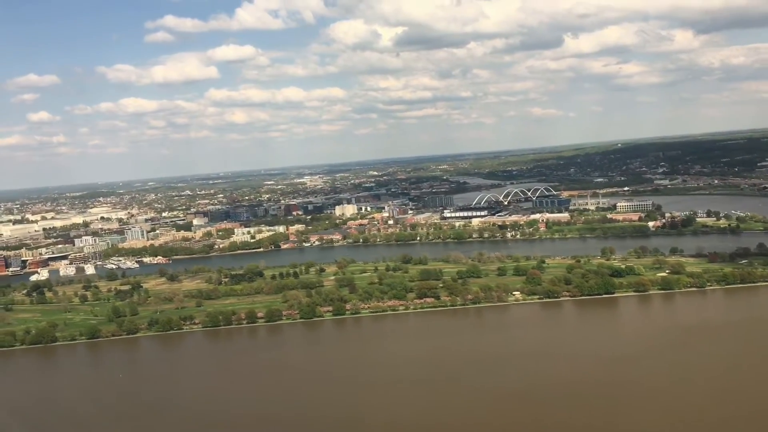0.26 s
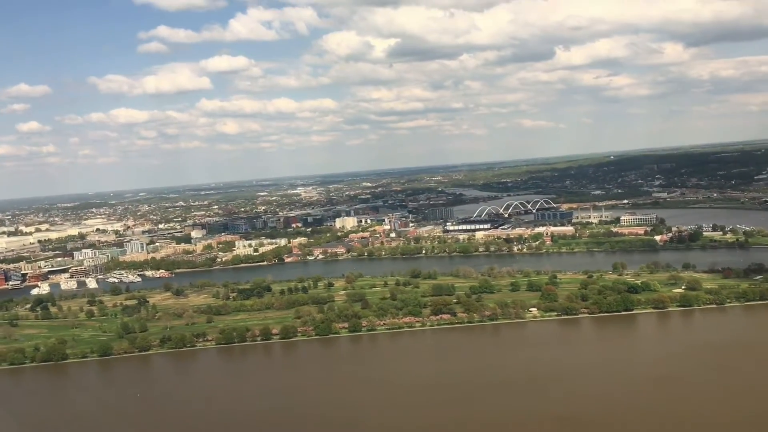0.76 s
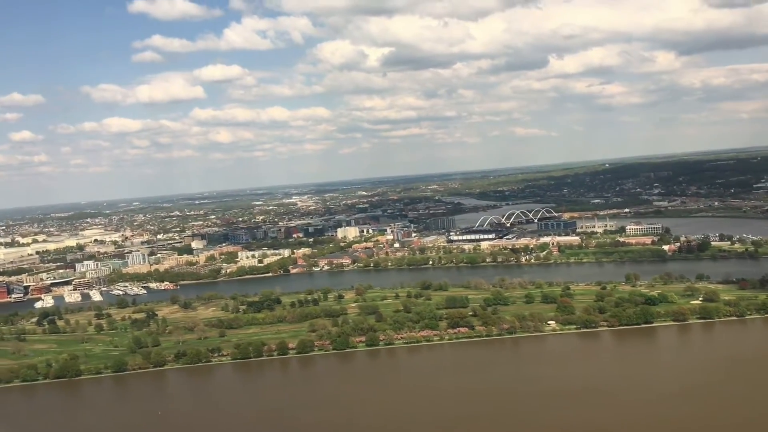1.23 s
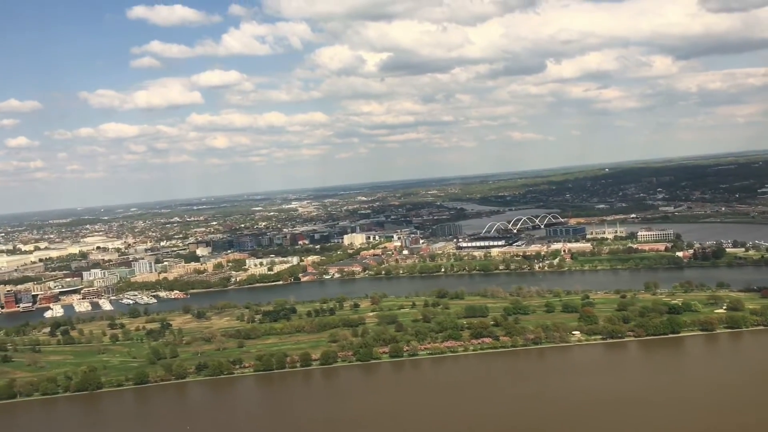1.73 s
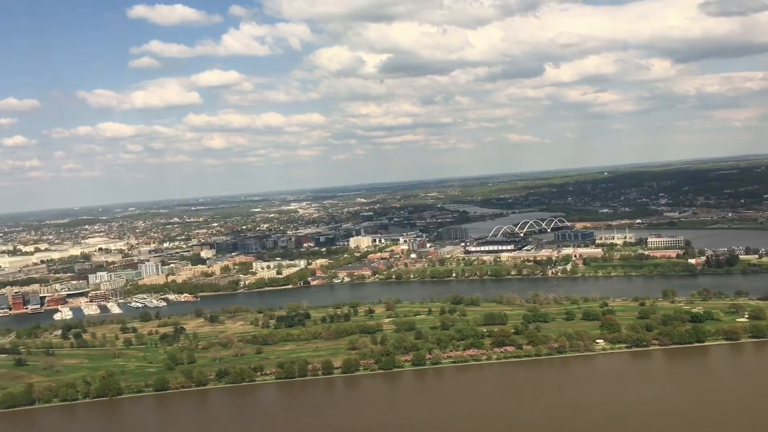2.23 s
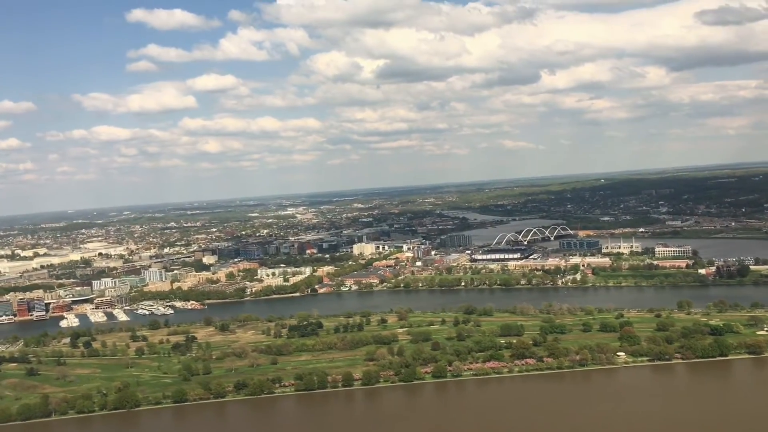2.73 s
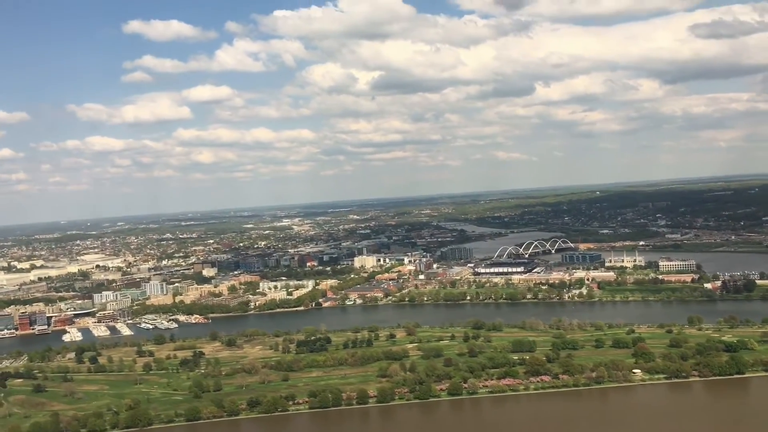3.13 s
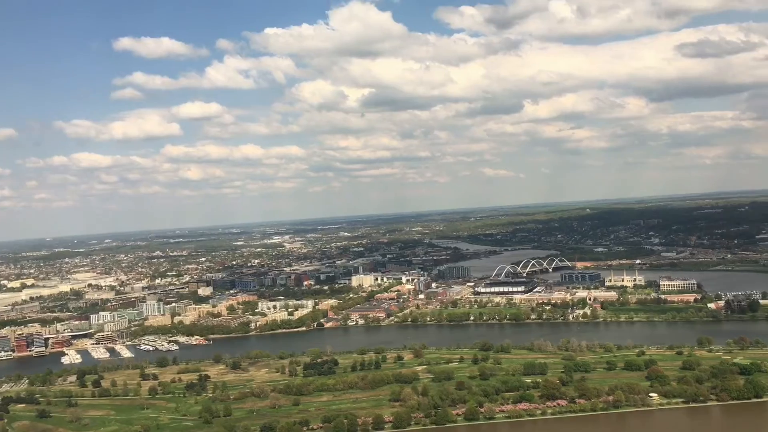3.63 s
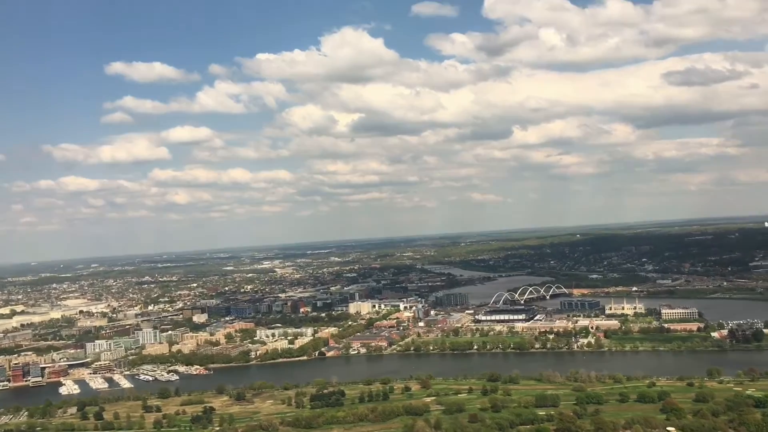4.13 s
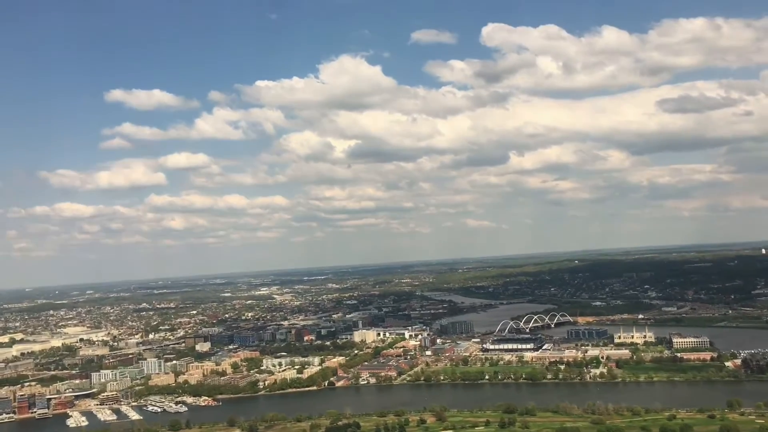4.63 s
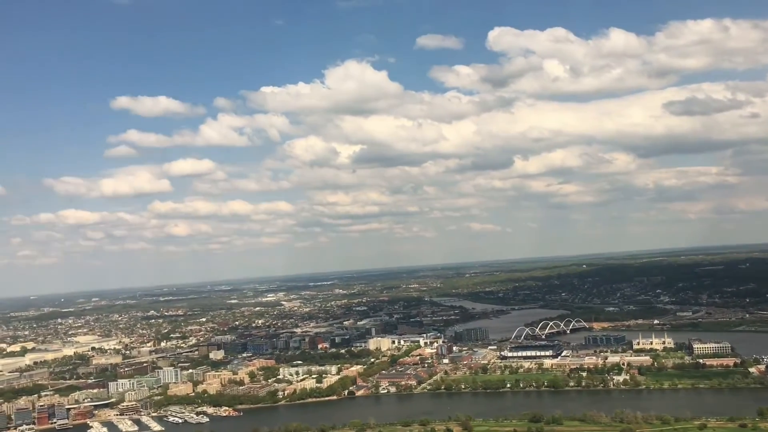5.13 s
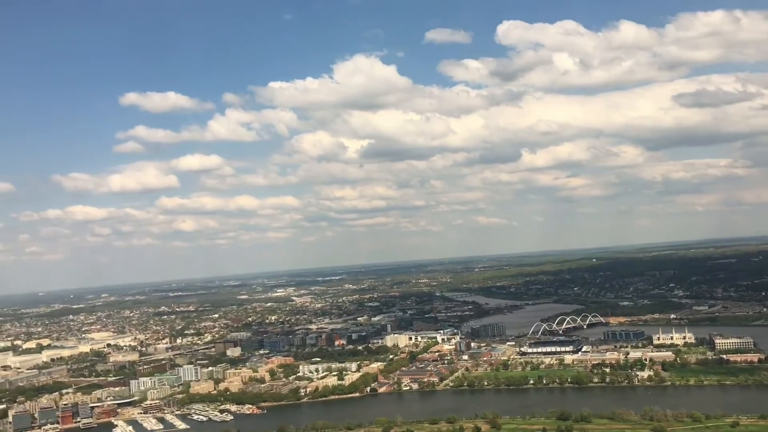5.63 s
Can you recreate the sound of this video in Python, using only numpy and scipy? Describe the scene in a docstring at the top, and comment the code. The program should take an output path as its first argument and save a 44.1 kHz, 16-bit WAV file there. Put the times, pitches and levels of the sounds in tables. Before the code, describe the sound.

Deep, steady jet roar inside an airliner cabin, with low booming rumble, soft air hiss, faint wavering whine and occasional thumping buffets.

```python
"""A window seat inside a regional airliner climbing after takeoff, the microphone at the seat.
Jet exhaust and airflow shake the fuselage: shaped noise makes a deep roar, with thumping buffets, under a
hiss of air. Supersonic fan tips add a faint buzz-saw whine, a wavering tone on each multiple of the shaft
speed. Steady machine tones lie behind it, and grainy puffs of noise rustle nearby."""
import sys
import numpy as np
from scipy import signal
from scipy.fft import irfft, next_fast_len
from scipy.io import wavfile
from scipy.ndimage import uniform_filter1d, minimum_filter1d

SR = 44100
rng = np.random.default_rng(int(sys.argv[2]) if len(sys.argv) > 2 else 0)


def store_pcm(level_fs):
    """Save levels as 16-bit WAV."""
    pcm = np.round(np.clip(level_fs, -1, 1) * 32767).astype(np.int16)
    wavfile.write(sys.argv[1], SR, np.atleast_2d(pcm).T)


N = 258426
TIME = np.arange(N) / SR  # s
FREQ = np.fft.rfftfreq(2 * next_fast_len(N // 2 + 1), 1 / SR)  # Hz
PATH_STEPS = 2048  # points in one slow path across the whole scene


def gain_of(db):
    """Decibels to amplitude."""
    return np.exp(np.asarray(db) * np.log(10) / 20)


def evened(x):
    """Scales to rms 1."""
    return x / np.sqrt(np.mean(abs(x) ** 2) + 1e-30)


def read(points, hz):
    """A spectrum's dB at hz, on a log-frequency axis; silent beyond its ends."""
    f, db = np.transpose(points)
    return np.interp(np.log(hz + 1), np.log(f + 1), db, left=-200, right=-200)


def bumps(peaks):
    """Resonances, or dips where dB is negative, as dB over FREQ."""
    return sum(db / (1 + (2 * (FREQ - hz) / width) ** 4) for hz, width, db in peaks)


def curve(rows):
    """The second column of a timed table, at every sample."""
    s, values = np.transpose(rows)
    return np.interp(TIME, s, values)


def swell(s, length, order=2):
    """A smooth rise to 1 at time s, and its fall; a higher order holds the top."""
    return np.exp(-np.minimum(2 * abs(TIME - s) / length, 3) ** order)


def noise(db):
    """Noise of rms 1 with the spectrum db over FREQ."""
    real, imaginary = rng.standard_normal((2, len(FREQ)))
    spectrum = (real + 1j * imaginary) * gain_of(db)
    return evened(irfft(spectrum)[:N])


def flutter(width_hz):
    """A slow complex wander of rms 1 and the given bandwidth, in PATH_STEPS steps."""
    hz = np.fft.fftfreq(PATH_STEPS, N / SR / PATH_STEPS)
    z = rng.standard_normal((PATH_STEPS, 2)) @ [1, 1j]
    return evened(np.fft.ifft(z / (1 + (2 * hz / width_hz) ** 2)))


def stretched(path):
    """A slow path joined by straight lines, at every sample."""
    path = path.astype(np.float32)
    ramp = np.linspace(0, 1, N // (len(path) - 1) + 1, False, dtype=np.float32)
    return (path[:-1, None] + np.diff(path)[:, None] * ramp).ravel()[:N]


def tone(turns, path):
    """A line of rms 1 whose strength and phase follow the complex path."""
    angle = (2 * np.pi * (turns - np.floor(turns))).astype(np.float32)
    path = np.sqrt(2) * evened(path) * np.exp(2j * np.pi * rng.random())  # random starting phase
    return stretched(path.real) * np.cos(angle) - stretched(path.imag) * np.sin(angle)


AIRSPEED_DB_PER_S = 0.36  # the airflow grows as the aircraft gathers speed
# surges of the airflow outside the window: (time [s], rise [dB], length [s])
SURGES = [(1.5, -0.2, 0.45), (2.17, 2.5, 0.49), (2.55, 1.5, .4), (3.815, 1, .3), (4.92, 2, 0.24),
          (5.33, 1, .35)]


def airflow_db():
    """Strength of the airflow: a slow climb with a few surges."""
    climb = AIRSPEED_DB_PER_S * (TIME - TIME.mean())
    return climb + sum(db * swell(s, length) for s, db, length in SURGES)


# the fan's drone stands in the cabin as a drifting pattern;
# how near the microphone is to a quiet spot of it: (time [s], nearness [0-1])
QUIET_SPOT = [(0, .15), (1.1, 0.41), (2.35, 0.24), (3.0, 0.84), (3.75, 0.96), (4.75, 0.02), (5.86, 0.04)]


def quiet_spot_nearness():
    """How near the seat is to a quiet spot of the drone, 0 to 1."""
    return curve(QUIET_SPOT)


# brief soft rustles nearby, perhaps of clothing: (time [s], level [dB], length [s])
RUSTLES = [(2.017, -53, .04), (2.099, -44.5, 0.036), (2.139, -44.5, 0.047), (3.39, -49, .025),
           (3.715, -47, .03), (4.204, -47, .03), (5.23, -48, .035), (5.30, -49, .02), (5.374, -45, .025),
           (5.408, -47, 0.036)]
# their relative noise spectrum: (frequency [Hz], density [dB per Hz])
RUSTLE_COLOUR = [(800, -19), (2500, 10), (4500, -0.5), (8000, -4), (12000, -10), (16000, -15)]


def rustles(rise_s=0.0027, grain=0.28, grain_hz=300):
    """Each rub is a grainy puff that starts quickly and dies away."""
    stroke = np.zeros(N)
    for s, db, length in RUSTLES:
        age = np.clip(TIME - s, 0, 10 * length)
        stroke += gain_of(db) * np.minimum(age / rise_s, 1) * np.exp(-(age / length) ** 2)
    roughness = stretched(abs(1 + grain * flutter(grain_hz)))
    return stroke * roughness * noise(read(RUSTLE_COLOUR, FREQ))


# engine cores, pumps and cabin fans heard at the seat: (frequency [Hz], level [dB], width [Hz])
MACHINES = [(267.1, -38, 3), (686, -55.5, 3), (1726, -56.5, 13), (2255, -61.5, 9), (2697, -62, 1.5)]


def machines(steady=0.62):
    """Wavering tones unrelated to the fan speed."""
    return sum(gain_of(db) * tone(hz * TIME, steady + flutter(width)) for hz, db, width in MACHINES)


# moments when one shaft order swells and sings out: (time [s], multiple, rise [dB], length [s])
FLARES = [(.32, 11, 3.5, 0.15), (.55, 56, 6.5, 1.3), (.66, 11, 5.5, 0.12), (1.067, 4, 2.5, 0.28),
          (1.22, 28, 6, 0.75), (1.3, 6, 3.5, 1.3), (1.7, 40, 7.5, 0.93), (2.15, 5, 3, 0.27),
          (2.174, 11, 6.5, 0.38), (2.33, 33, 9, 0.61), (2.53, 6, 8, 0.39), (2.57, 28, 7.5, 0.46),
          (2.6, 56, 4, .8), (3.95, 11, 4.5, .3), (4.0, 35, 10, 0.5), (4.1, 89, 13, .4),
          (4.3, 22, 6.5, 0.99), (4.677, 35, 10, 0.51), (4.81, 28, 8, 0.75), (5.55, 17, 6, 0.72),
          (5.55, 84, 15, .7)]


def flare_db(multiple):
    """How far one shaft order stands above its usual level."""
    return sum(db * swell(s, length, order=4) for s, k, db, length in FLARES if round(k) == multiple)


# levels of the shaft orders are before flares and airflow
# fan shaft speed: (time [s], speed [turns per s])
SHAFT = [(0.0, 109.58), (1.6, 109.53), (4.2, 109.67), (5.86, 109.7)]
# low orders that make the drone, their level at time 0 away from the quiet spot:
# (multiple, level [dB], change at the quiet spot [dB], drift [dB per s])
DRONE = [(3, -30.5, -8, -1.55), (4, -40, 7.5, -0.41), (5, -35.5, -9.5, 0.14), (6, -42, -14.5, 0.58)]
# the strongest whining orders: (multiple, level [dB], weight of the steady part, rate of fading [Hz])
WHINE = [(11, -51.5, .9, 8.3), (17, -55, .9, 6), (28, -59, 1.4, 8.6), (35, -65.5, 1.3, 4.3),
         (56, -67.5, .9, 9)]
# the weaker shaft orders: (multiple, level before buzz_db [dB])
BUZZ = [(2, -31.5), (7, -50), (8, -62.5), (9, -54.5), (10, -54.5), (12, -68), (13, -57), (15, -70),
        (19, -60), (22, -61), (23, -75), (24, -66.5), (25, -65.5), (27, -70), (29, -71.5), (31, -70.5),
        (32, -66.5), (33, -62), (36, -61.5), (37, -61), (38, -67), (39, -63.5), (40, -62.5), (41, -65.5),
        (45, -68.5), (46, -68.5), (51, -68.5), (52, -70)]
# the comb of high orders between and above those: (frequency [Hz], level of one order before comb_db [dB])
COMB = [(2000, -76), (4700, -82), (6200, -73), (7200, -76), (7700, -81.5), (8800, -80.5), (10000, -84),
        (11000, -86.5)]


def fan(buzz_db=-1.0, comb_db=0.5, scatter=0.015, scatter_hz=20, fade_hz=0.075, direct=0.97, short_order=30,
        drone_waver=.2, drone_waver_hz=4, flow_share=0.48):
    """Unequal blade shocks repeat once a turn; shifting paths into the cabin make each order fade."""
    speed_hz = curve(SHAFT)
    nearness = quiet_spot_nearness()
    turns, mean_hz = np.cumsum(speed_hz) / SR, speed_hz.mean()
    drone, whine, buzz = ({round(k): rest for k, *rest in table} for table in (DRONE, WHINE, BUZZ))
    out = np.zeros(N)
    for k in range(2, 101):
        blur = scatter * k * flutter(scatter_hz)  # turbulence scatters the short waves most
        if k in drone:
            db, quiet_db, drift_db = drone[k]
            db = db + quiet_db * nearness + drift_db * TIME
            path = 1 + drone_waver * flutter(drone_waver_hz)
        elif k in whine:
            db, steady, fading_hz = whine[k]
            path = steady + flutter(fading_hz) / 2
        else:
            db = buzz[k][0] + buzz_db if k in buzz else read(COMB, k * mean_hz) + comb_db
            # high orders fade deeper and faster
            path = direct / (1 + (k / short_order) ** 3) + flutter(1 + fade_hz * k)
        out += gain_of(db + flare_db(k)) * tone(k * turns, path + blur)
    return gain_of(flow_share * airflow_db()) * out


# relative spectrum of the hiss: (frequency [Hz], density [dB per Hz])
HISS = [(1200, -100), (1600, -76.5), (1850, -73.5), (2200, -79), (2900, -82.5), (3100, -80.5),
        (4350, -86.5), (4750, -90), (6150, -87.5), (7100, -94.5), (7750, -98), (8500, -96.5), (9900, -97),
        (10300, -101), (11500, -100.5), (16000, -108)]
# narrow colours added to it: (frequency [Hz], width [Hz], height [dB])
HISS_PEAKS = [(8800, 250, 6), (11900, 750, 1.5), (10400, 500, -6)]


def hiss(body_db=-47.0, top_db=-59.0, top_flow_share=0.82, split_hz=6800, waver_db=.5, waver_hz=5):
    """Air rushes past the window and out of the vents; body and top follow the airflow, each wavering."""
    colour, flow_db = read(HISS, FREQ) + bumps(HISS_PEAKS), airflow_db()
    top_share = 1 / (1 + (split_hz / (FREQ + 1)) ** 10)  # share of the power
    body = body_db + flow_db, 1 - top_share
    top = top_db + top_flow_share * flow_db, top_share
    out = np.zeros(N)
    for db, share in (body, top):
        waver = waver_db * stretched(flutter(waver_hz).real)
        out += gain_of(db + waver) * noise(colour + 10 * np.log10(share + 1e-12))
    return out


# relative spectrum of the air drumming on the skin: (frequency [Hz], density [dB per Hz])
ROAR = [(200, -79), (300, -57), (350, -51), (380, -58), (430, -55), (570, -60), (730, -69), (800, -64.5),
        (1120, -73), (1210, -68), (1480, -79), (1900, -110.5)]


def roar(level_db=-31.5, quiet_spot_db=-0.74):
    """The turbulent air layer drums on the skin panels."""
    db = level_db + airflow_db() + quiet_spot_db * quiet_spot_nearness()
    return gain_of(db) * noise(read(ROAR, FREQ))


# relative spectrum of the exhaust rumble: (frequency [Hz], density [dB per Hz])
RUMBLE = [(14, -52), (28, -54), (50, -37.5), (72, -32), (90, -35.5), (155, -38), (190, -37), (215, -51.5),
          (265, -49), (330, -62), (500, -101.5)]
# booming air modes of the cabin: (frequency [Hz], width [Hz], height [dB])
CABIN_MODES = [(71, 39, -0.5), (152, 8.5, 3.5)]


def cabin_boom():
    """Low noise coloured by the air modes of the cabin, rms 1."""
    return noise(read(RUMBLE, FREQ) + bumps(CABIN_MODES))


# buffets that thump the fuselage: (time [s], level [dB], length [s])
BUFFETS = [(0.392, -11.5, 0.041), (0.502, -9, 0.015), (0.759, -11.5, 0.051), (2.315, -10, 0.11),
           (5.009, -4.5, 0.017), (5.793, -9, 0.042)]


def buffets():
    """Each gust is a short burst of the cabin's own boom."""
    boom, out = cabin_boom(), np.zeros(N)
    for s, db, length in BUFFETS:
        shape = swell(s, length)
        push = shape * boom
        # every burst gets the energy of its shape, whatever the noise does there
        out += gain_of(db) * push * np.linalg.norm(shape) / np.linalg.norm(push)
    return out


def rumble(level_db=-13.0, steadiness=0.49, span_s=0.15):
    """Exhaust noise booms through the fuselage at a nearly steady strength."""
    boom, span = cabin_boom(), round(span_s * SR)
    # the thrust is constant, so the boom's slow swells are partly evened out
    power = uniform_filter1d(uniform_filter1d(boom ** 2, span), span // 2)
    surge = np.sqrt(abs(power) + 1e-6)
    return gain_of(level_db) * evened(boom / surge ** steadiness)


def scene():
    """All that reaches the microphone at the seat, as one channel."""
    return (rustles() + machines() + fan() + hiss() + roar() + buffets() + rumble())[None]


CEILING, EDGE_HZ = .99, 15720  # limiter ceiling (full scale = 1), top of the microphone's band [Hz]


def record(dry, hold_s=0.0092):
    """A smooth limiter holds the biggest booms under full scale; then brief end fades and the band limit."""
    span = round(hold_s * SR)
    allowed = np.minimum(1, CEILING / (abs(dry) + 1e-9))
    limited = dry * uniform_filter1d(minimum_filter1d(allowed, span), span)
    faded = limited * signal.windows.tukey(N, .001)
    lowpass = signal.firwin(1023, EDGE_HZ, window=("kaiser", 9), fs=SR)
    return signal.oaconvolve(faded, lowpass[None], "same")


dry = scene()
out = record(dry)
store_pcm(out)
```